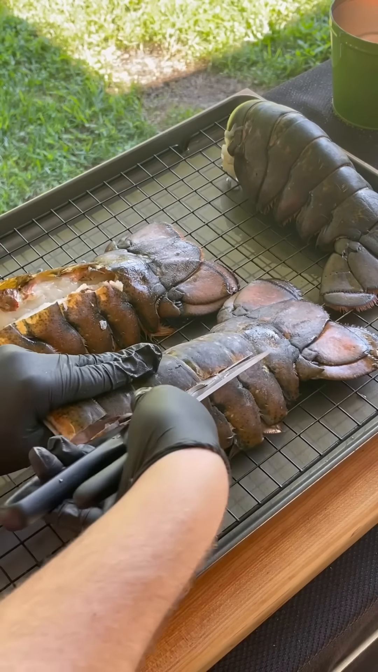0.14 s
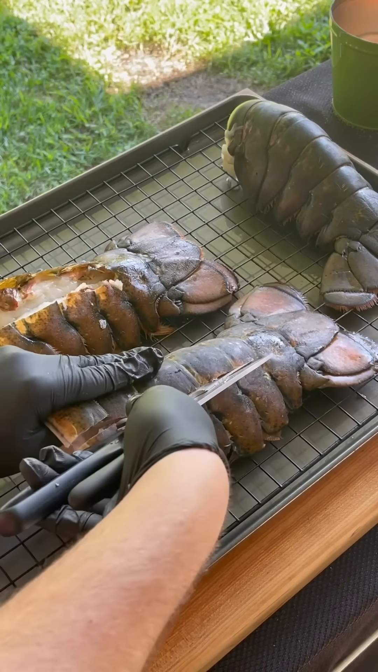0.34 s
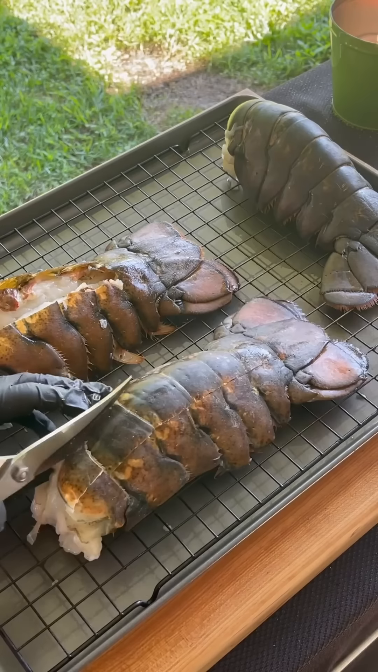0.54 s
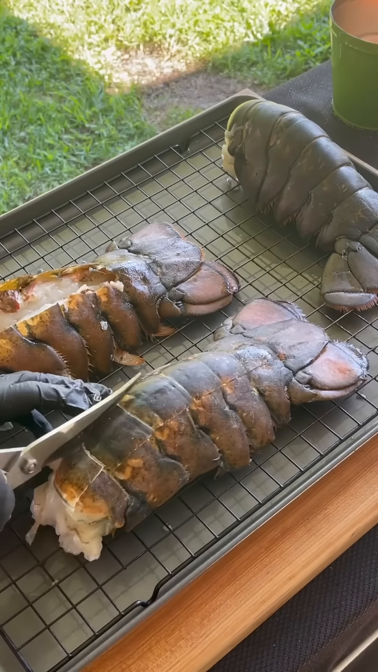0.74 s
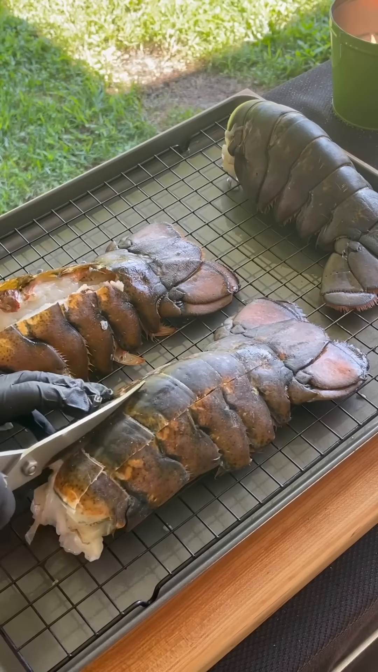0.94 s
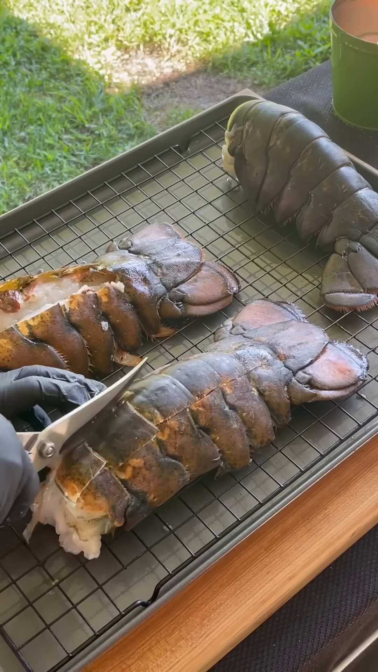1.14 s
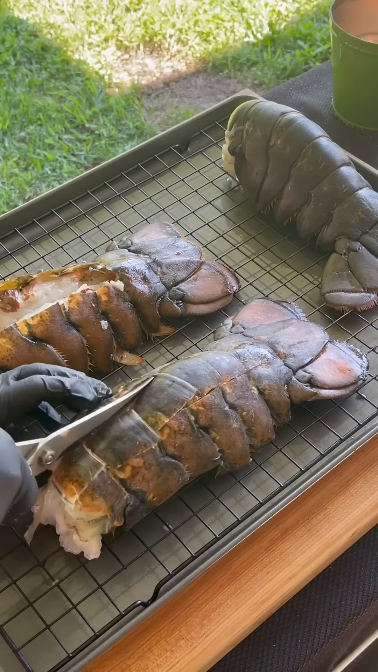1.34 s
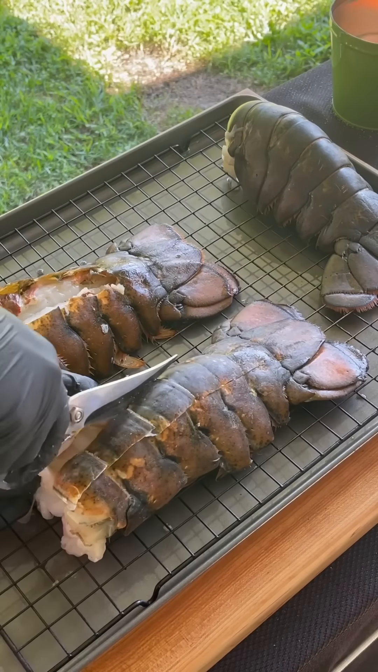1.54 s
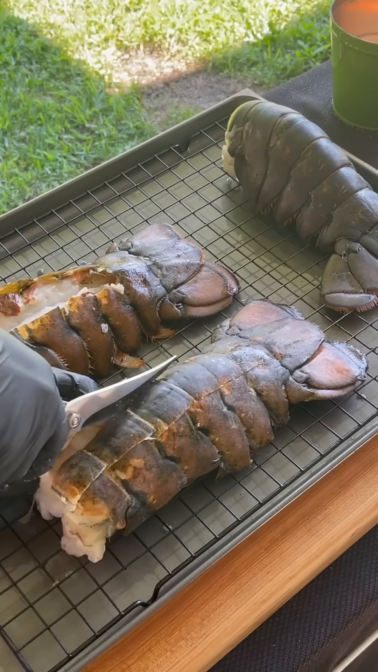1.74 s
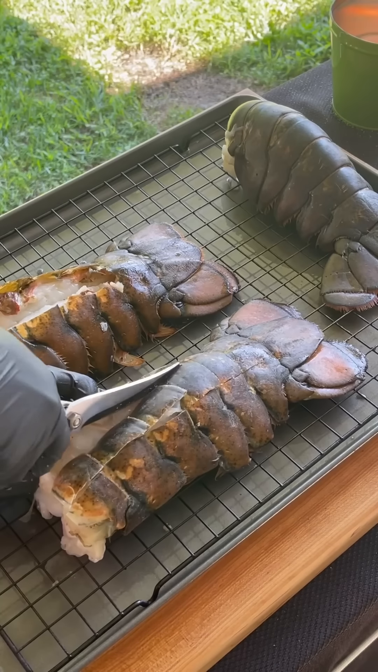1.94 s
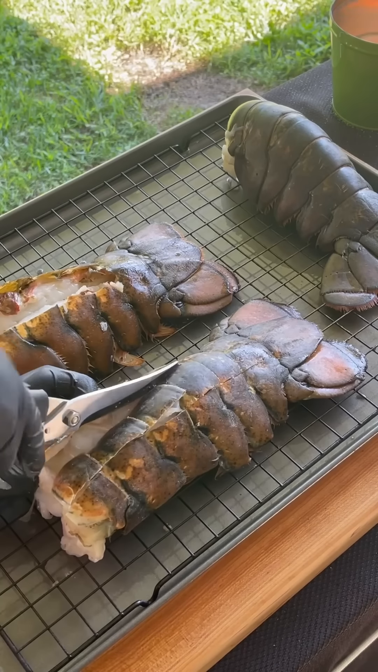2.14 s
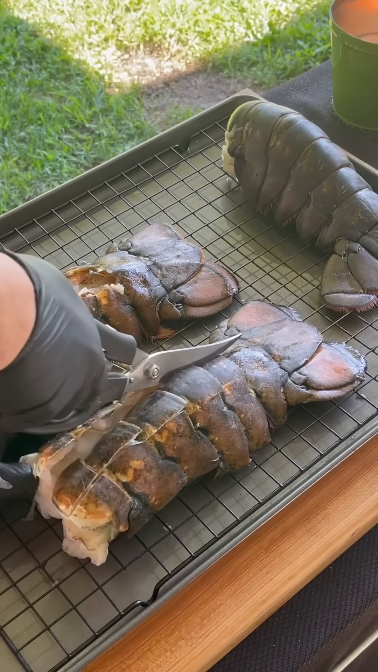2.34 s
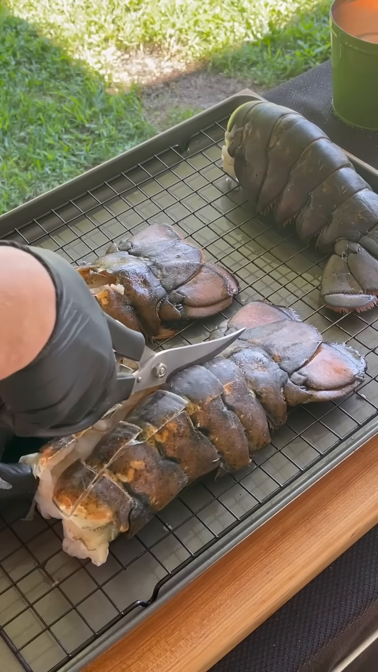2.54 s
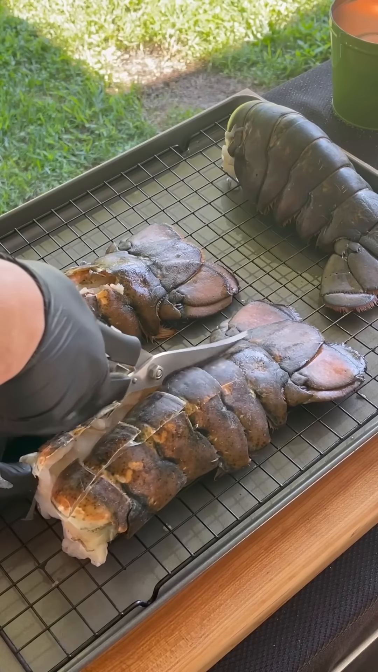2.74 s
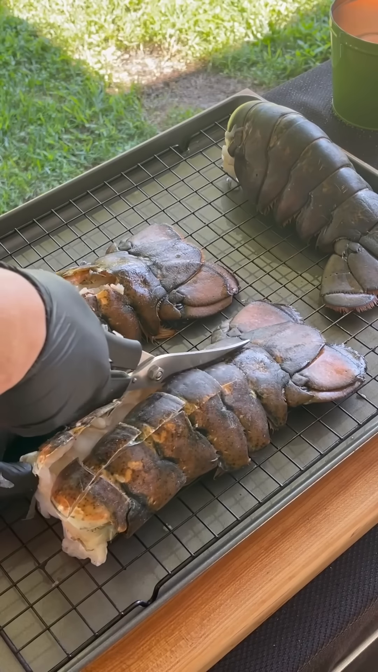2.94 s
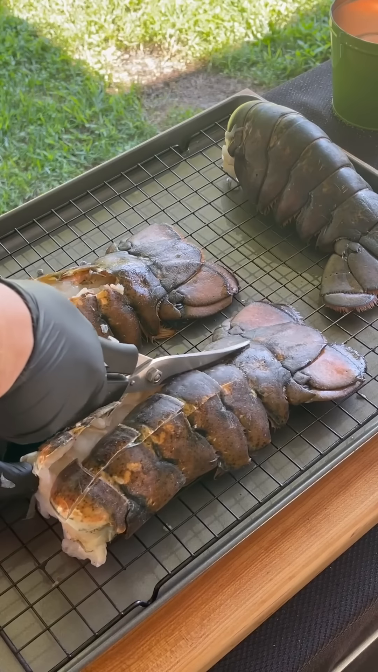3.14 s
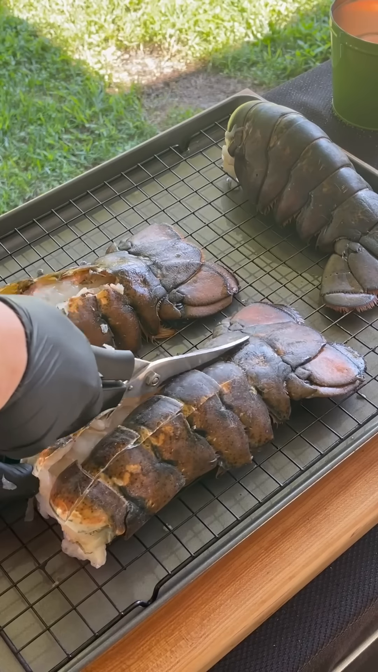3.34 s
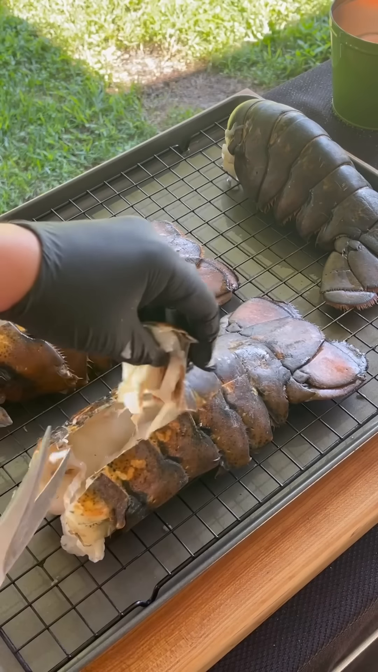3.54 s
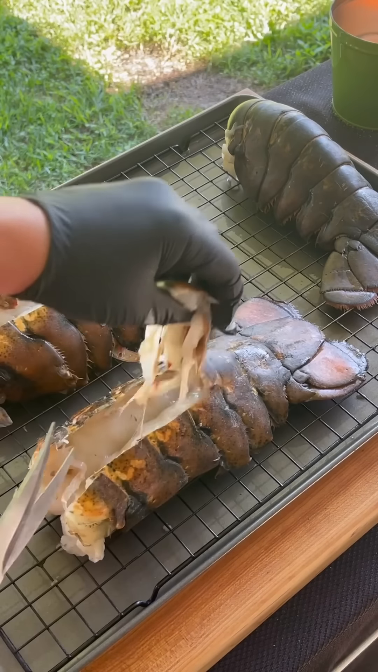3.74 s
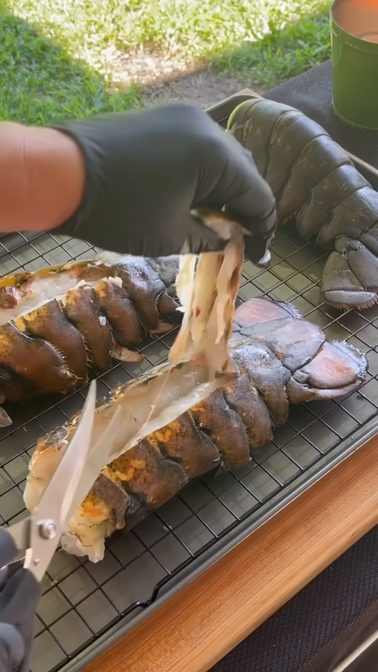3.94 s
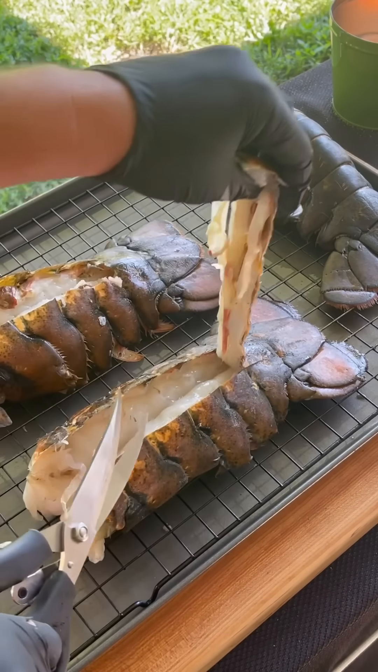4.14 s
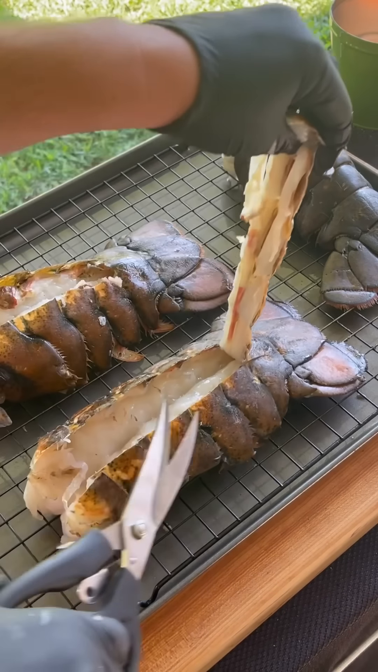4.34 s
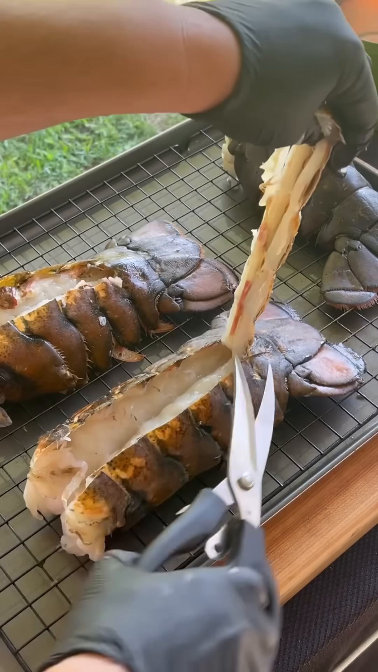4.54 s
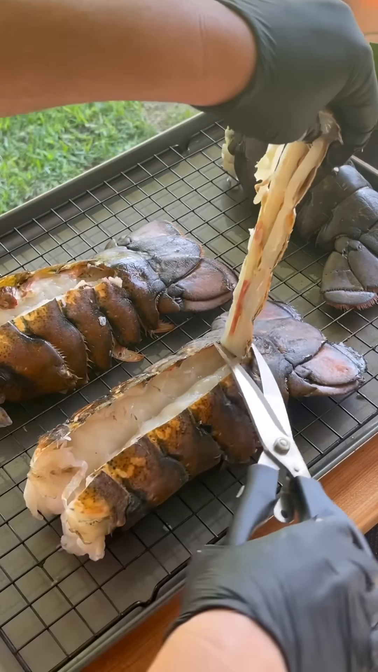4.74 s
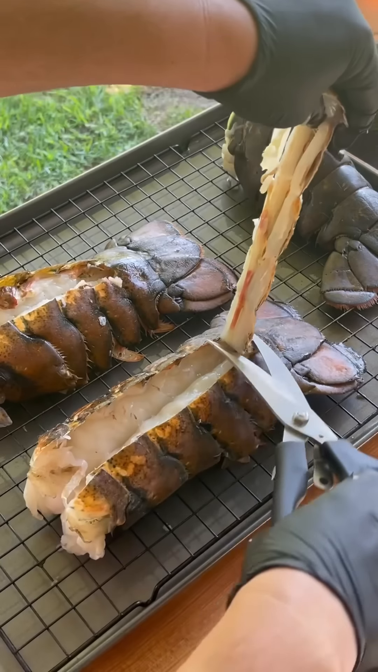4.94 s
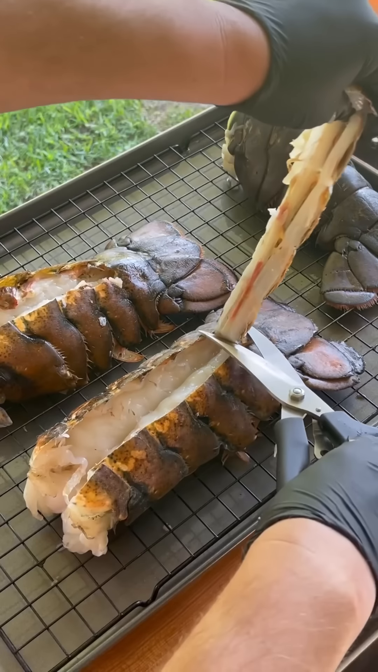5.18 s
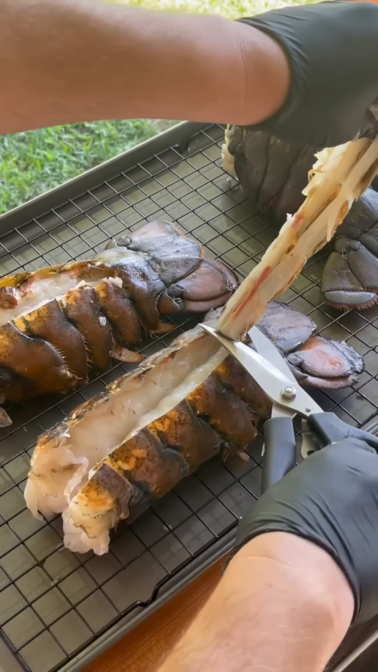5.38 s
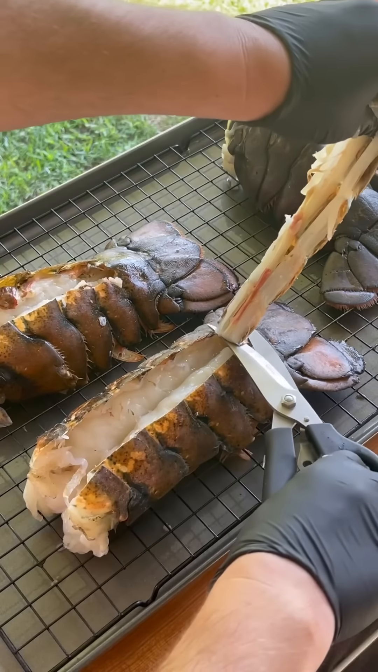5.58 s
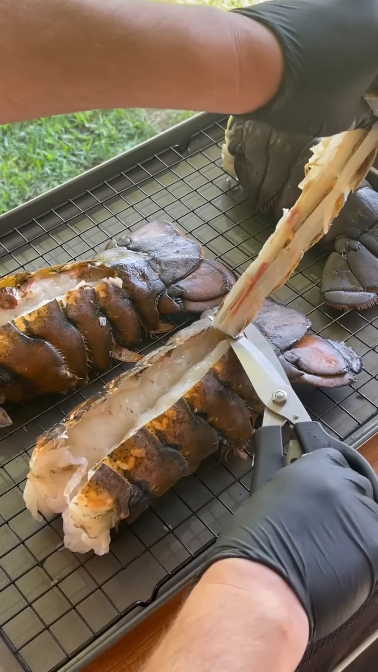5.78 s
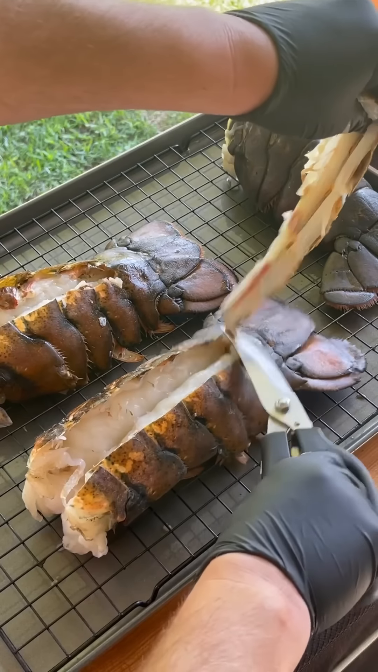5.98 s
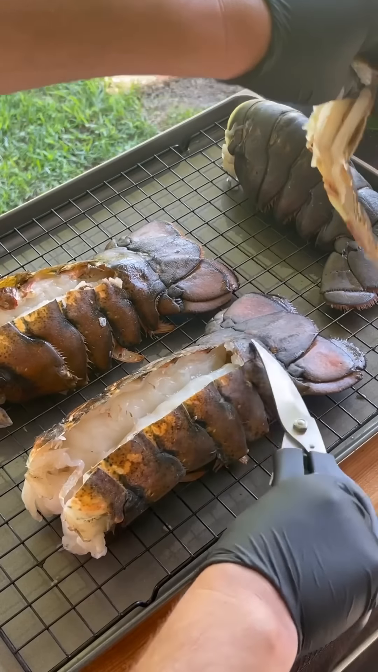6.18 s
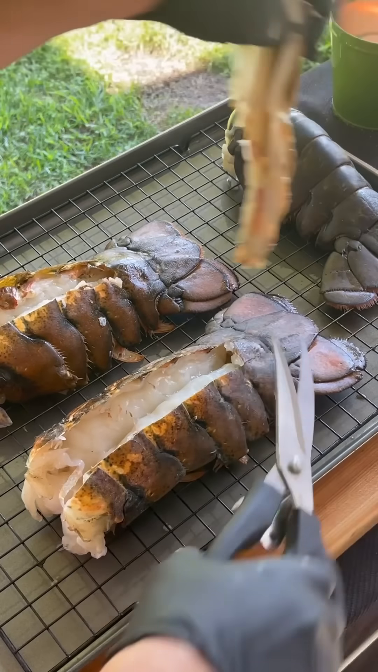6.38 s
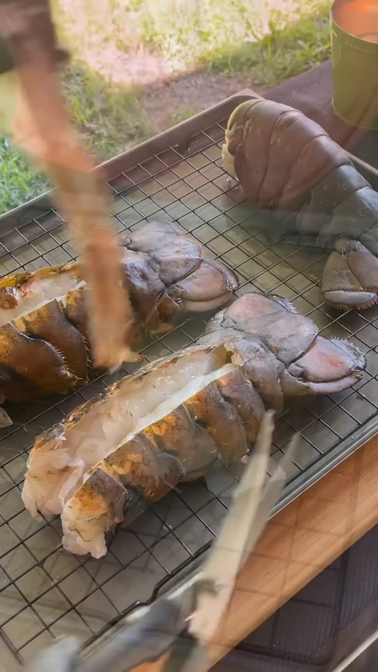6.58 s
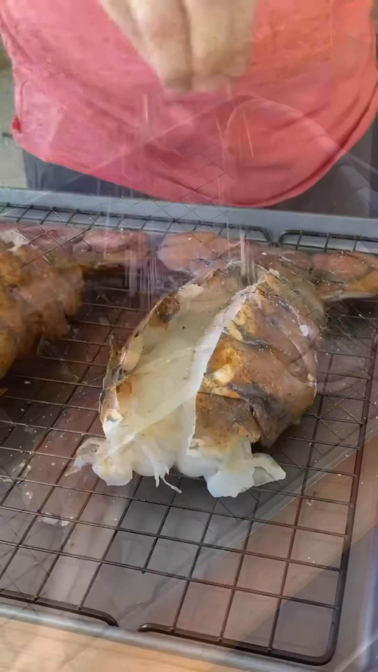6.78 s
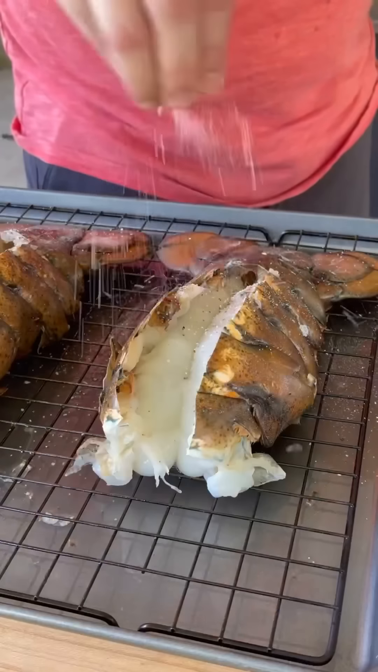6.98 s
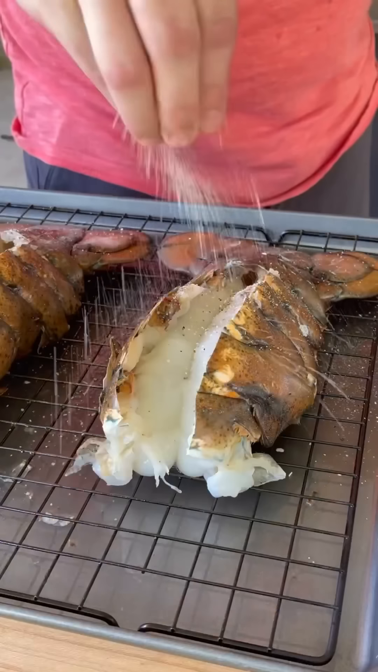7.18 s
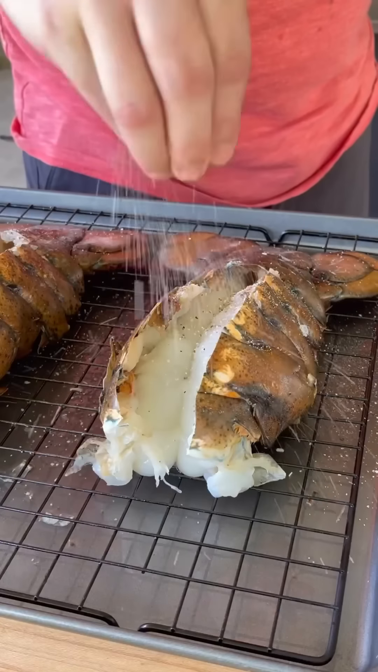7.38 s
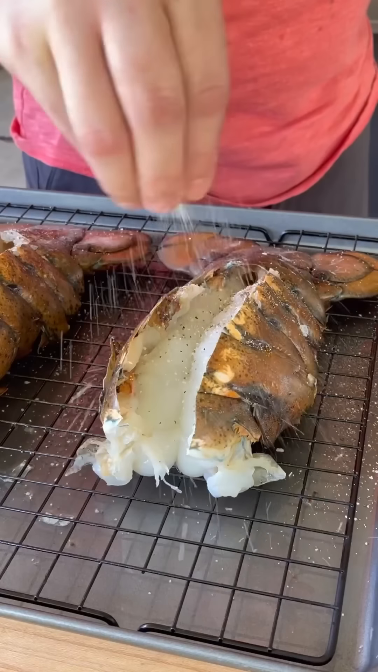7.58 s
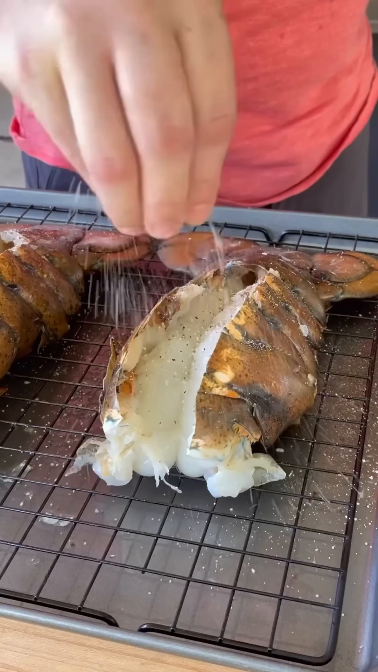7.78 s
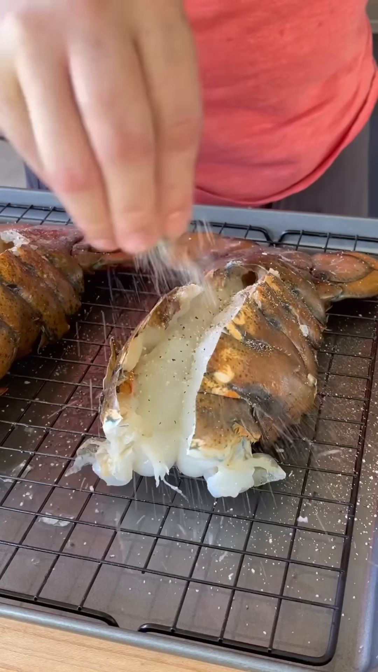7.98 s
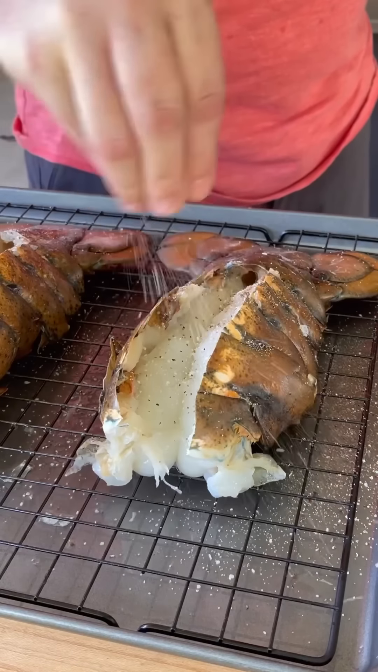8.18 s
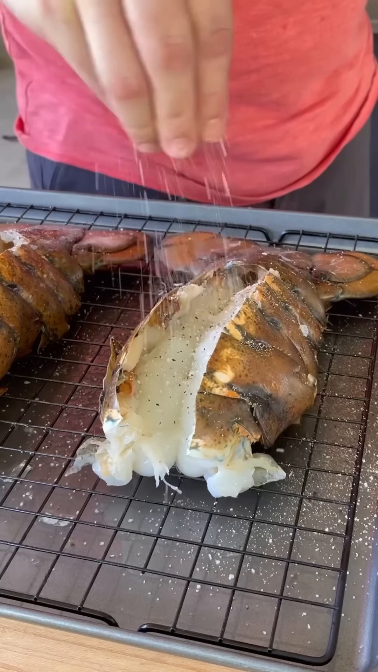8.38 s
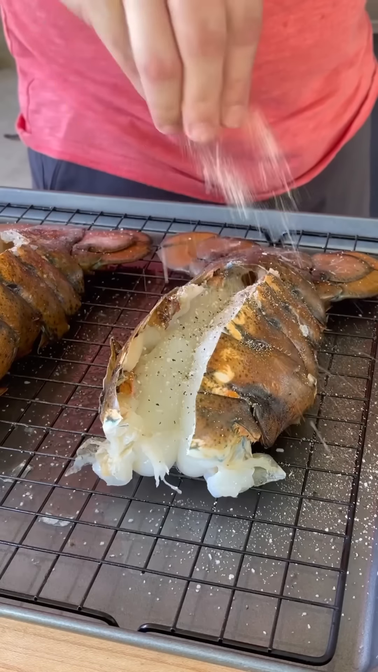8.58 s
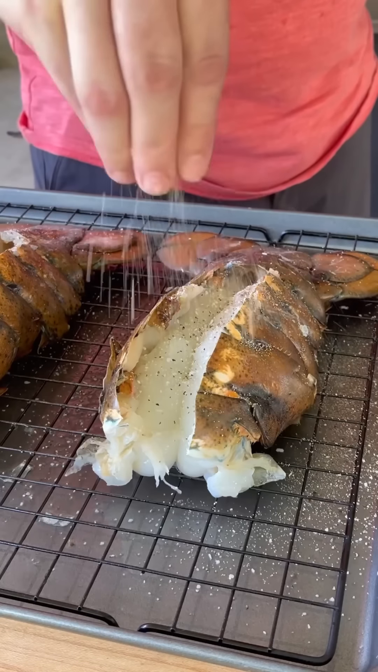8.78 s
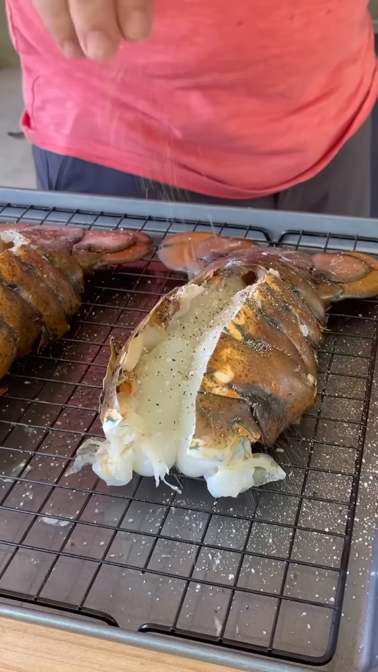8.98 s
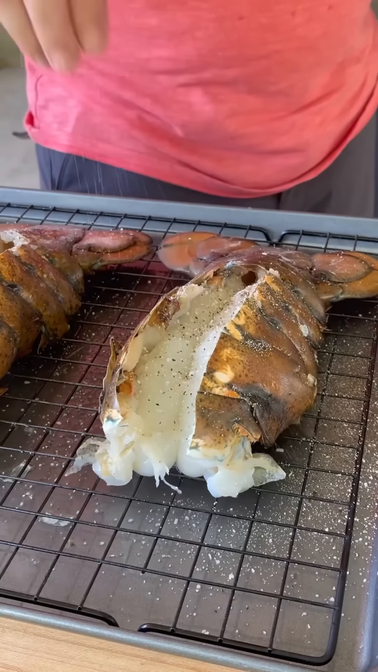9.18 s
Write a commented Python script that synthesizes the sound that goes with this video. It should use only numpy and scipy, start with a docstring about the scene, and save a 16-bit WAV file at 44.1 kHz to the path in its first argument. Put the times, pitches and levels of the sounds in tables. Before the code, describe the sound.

Hard shell snaps and crunches under scissor blades outdoors, a strip is peeled and clipped off, then grains of seasoning sprinkle down in a bright, ticking shower.

```python
"""Kitchen shears snip through lobster shells on a wire rack under a porch roof: noise bursts ring shell modes.
A drone fades at the start; a strip of shell is peeled and cut off over rubbing clicks and soft tray thuds.
From 6.5 s coarse seasoning rains on meat and tray as random grains, and a motor of sine orders and hiss joins.
Wavering hum lines, shaped-noise rumble, air and insects run throughout, with a short porch tail.
Two microphone ports hear the same sound with a phase turn that grows with pitch."""
import sys
import numpy as np
from scipy import signal
from scipy.fft import rfft, irfft, next_fast_len
from scipy.io import wavfile
from scipy.ndimage import uniform_filter1d

SR = 44100
rng = np.random.default_rng(int(sys.argv[2]) if len(sys.argv) > 2 else 0)


def digitize_waveform(pressure):
    """Quantize a signal to 16-bit integers and store it at the path in sys.argv[1].

    Rows of a 2-D input are taken as channels; values are limited to [-1, 1].
    """
    field = np.atleast_2d(pressure).T
    bounded = np.clip(field, -1, 1)
    quanta = np.round(bounded * 32767).astype(np.int16)
    wavfile.write(sys.argv[1], SR, quanta)


N = 406602
SIZE = next_fast_len(N + 4096)
HZ = np.maximum(np.fft.rfftfreq(SIZE, 1 / SR), 1)
TIME_S = np.arange(N) / SR
MODE_SPREAD_DB = 2.8   # chance strength of each mode in each blow

# diffuse left-right difference: pitch_hz, level_re_middle_db
SIDE_SPECTRUM = [(150, -30.5), (300, -7.5), (500, -1.5), (1100, -1.5), (1500, -5.5), (2000, -25),
                 (8000, -7.5), (14000, -27)]


def from_db(db):
    """Decibels to gain."""
    return 10 ** (np.asarray(db) / 20)


def rms_one(x):
    """Scale to unit rms."""
    return x / np.sqrt(np.mean(x ** 2) + 1e-20)


def in_time(rows):
    """Interpolate the columns of a time table at every sample."""
    s, *columns = np.transpose(rows)
    return [np.interp(TIME_S, s, column) for column in columns]


def at_hz(points):
    """Interpolate a spectrum table over log frequency at every FFT bin."""
    hz, value = np.transpose(points)
    return np.interp(np.log(HZ), np.log(hz), value)


def colour(x, points):
    """Filter by a spectrum table in dB, zero phase."""
    return irfft(rfft(x, SIZE) * from_db(at_hz(points)), SIZE)[..., :N]


def drift(rate_hz):
    """Slow random wander of unit rms: noise rolled off above rate_hz."""
    spectrum = rfft(rng.standard_normal(SIZE)) / (1 + (HZ / rate_hz) ** 2)
    return rms_one(irfft(spectrum, SIZE)[:N])


def resonate(x, hz, t60_s):
    """Two-pole decaying mode along the last axis."""
    r = from_db(-60 / (t60_s * SR))
    w = 2 * np.pi * hz / SR
    return signal.lfilter([0, np.sin(w)], [1, -2 * r * np.cos(w), r * r], x + 1e-18)


def band(x, low_hz, high_hz):
    """Second-order band-pass along the last axis."""
    return signal.sosfilt(signal.butter(2, [low_hz, high_hz], "band", fs=SR, output="sos"), x)


def random_clicks(per_s, spread_db):
    """Clicks of random sign, time and size (exponential in dB, capped)."""
    sizes = from_db(spread_db * np.minimum(rng.exponential(1, N), 5))
    signs = rng.choice([-1, 1], N)
    return sizes * signs * (rng.random(N) < per_s / SR)


def lay_out(times_s, rows):
    """Add each row at its time."""
    out = np.zeros(N + rows.shape[1])
    for s, row in zip(times_s, rows):
        at = round(s * SR)
        out[at:at + len(row)] += row
    return out[:N]


def three_voices(bursts, body_bursts, body_hz, upper_db):
    """Each burst rings the shell modes near its own pitch, a middle band and a bright band; levels set by caller."""
    # shell modes: pitch_hz, drive_db, t60_s
    shell_modes = [(510, -0.5, 0.009), (700, -1, 0.0061), (860, -0.5, 0.011), (1034, -4, 0.0035),
                   (1270, -2, 0.0099), (1526, 1.5, 0.0066), (1817, 5, 0.0074), (2110, 6, 0.01),
                   (2350, 9.5, 0.013)]
    body_cycles = 5.0   # 60 dB decay of the breaking piece, in cycles of its pitch
    chance = rng.standard_normal((len(bursts), len(shell_modes)))
    octaves = np.log2(np.array(shell_modes)[:, 0] / body_hz[:, None])
    strengths = from_db(MODE_SPREAD_DB * chance - 22.0 * octaves ** 2)
    modes = sum(strengths[:, [k]] * from_db(drive_db) * resonate(body_bursts, hz, t60_s)
                for k, (hz, drive_db, t60_s) in enumerate(shell_modes))
    # the piece that breaks rings most
    body = np.array([resonate(np.diff(row, prepend=0), hz, body_cycles / hz)
                     for row, hz in zip(modes, body_hz)])
    body = signal.sosfilt(signal.butter(2, 450, "high", fs=SR, output="sos"), body)
    middle = band(bursts, 1850, 2900) - from_db(upper_db[:, None]) * band(bursts, 3900, 8200)
    bright = band(bursts, 9000, 11700)
    bright = signal.sosfilt(signal.butter(5, 12300, fs=SR, output="sos"), bright)
    return body, middle, bright


def fractures(times_s, body_hz, levels_db, fall_12db_ms):
    """A fracture: a noise burst that rises fast and dies within milliseconds, in three voices."""
    rise_s, level_window_samples = 0.0004, 9
    t = np.arange(2048) / SR
    fall_s = np.maximum(fall_12db_ms[:, None], .05) / 1000
    bursts = rng.standard_normal((len(times_s), len(t))) * from_db(-12 * t / fall_s)
    bursts = bursts * np.clip(t / rise_s, 0, 1)
    _, middle_db, bright_db = levels_db
    # upper middle gain re lower middle: follows the brightness
    upper_db = -8 + 0.7 * (bright_db - middle_db) + 1.3 * rng.standard_normal(len(times_s))
    rows = 0
    for voice, db in zip(three_voices(bursts, bursts, body_hz, upper_db), levels_db):
        # level = loudest short-window rms
        power = uniform_filter1d(voice ** 2, level_window_samples)
        loudest = np.sqrt(power.max(axis=1, keepdims=True))
        rows = rows + voice / loudest * from_db(db[:, None])
    return lay_out(times_s, rows)


def shell_snaps():
    """Single snaps and ticks of the shell, each one fracture."""
    # snaps: start_s, body_hz, body_db, middle_db, bright_db, fall_12db_ms (floored at 0.05)
    snap_rows = [(0.047, 1150, -36.5, -43, -59, 5), (0.0613, 860, -48, -48, -45, 2),
                 (0.0735, 1240, -33, -48, -55, 4), (0.1218, 1400, -34.5, -47, -45, -0.5),
                 (0.135, 1400, -39, -50, -60, 4), (0.1456, 1400, -39, -65, -64, 2),
                 (0.1633, 1190, -39.5, -50, -62, 4), (0.1661, 660, -38, -42.5, -67, 5.5),
                 (0.181, 1310, -38, -45.5, -48, 1.5), (0.244, 940, -48, -48, -68, 20),
                 (0.306, 1350, -39.5, -66, -71, 2), (0.3363, 1300, -50, -80, -65.5, 0.5),
                 (0.4774, 920, -51, -58, -62, 10), (0.5076, 1040, -49, -56, -64, 21.5),
                 (0.63, 1670, -35.5, -31, -32.5, 3), (0.705, 1580, -42, -37.5, -36, 7),
                 (0.732, 1620, -12.5, -10.5, -6.5, 2.5), (0.7464, 1520, -33, -20, -6, -0.5),
                 (0.7472, 1500, -42, -19.5, -16, 2.5), (0.7497, 1510, -35, -18, -15, 5),
                 (0.97, 1080, -34, -40, -48, 2.5), (0.977, 900, -46, -47, -40, 6),
                 (1.0014, 1390, -29.5, -24, -20.5, 4), (1.0094, 1210, -41, -45, -34, 1),
                 (1.1456, 1060, -50, -40, -32, 1.5), (1.16, 1050, -50, -50, -40, 19),
                 (1.19, 1350, -37, -33, -23, 2.5), (1.201, 1490, -23.5, -19, -13, 3),
                 (1.2808, 1210, -16.5, -41, -7, 3.5), (1.534, 1795, -36, -22, -14.5, 3),
                 (1.54, 1850, -31.5, -22, -16.5, 2.5), (1.579, 1870, -48, -36, -28, 0.5),
                 (1.5829, 1300, -35, -20, -14, 2), (1.5854, 1190, -27, -22, -16, 0.5),
                 (1.594, 1370, -38, -37, -27, 1.5), (1.631, 1780, -24.5, -20, -15.5, 2.5),
                 (1.8897, 1120, -45, -46, -45.5, 7.5), (1.9, 1340, -58, -56, -51, 14),
                 (1.9038, 1130, -59, -45, -42.5, 2.5), (1.911, 830, -49, -50, -45.5, 5),
                 (1.9177, 1021, -46, -42, -30, 1), (2.0495, 1590, -38.5, -30.5, -24.5, 1.5),
                 (2.226, 1900, -60, -51, -70, -0.5), (2.271, 1590, -33, -35, -29.5, 14),
                 (2.5127, 1330, -41, -62, -63, 11), (2.6977, 1000, -65, -59.5, -45, 9),
                 (2.7213, 925, -32, -22, -18, 1.5), (2.747, 2000, -31, -26, -19, 1),
                 (2.7495, 1920, -19, -14.5, -10.5, 0), (2.7535, 1780, -22.5, -42, -32, 1.5),
                 (2.7825, 1590, -33, -44, -34.5, 2), (2.7959, 1850, -32, -35, -38, 1),
                 (2.871, 1990, -39, -46, -35, 0), (2.875, 1470, -30, -35, -30, 1.5),
                 (3.0313, 1440, -33.5, -38, -34.5, 3.5), (3.0523, 1710, -36, -40, -39, 0),
                 (3.0553, 1160, -38.5, -38, -28.5, 5.5), (3.102, 1800, -43, -40, -41, 10),
                 (3.114, 1780, -29.5, -41, -26.5, 4.5), (3.1203, 900, -27.5, -29, -17, 2),
                 (3.33, 1500, -49.5, -51, -61, 3.5), (3.381, 1280, -50, -49, -58, 8.5),
                 (3.395, 1100, -48, -47.5, -54, 7), (3.508, 1900, -49.5, -61, -62, 6),
                 (3.6627, 2000, -51, -59, -58, 0), (3.6785, 1800, -51, -55, -62, 4),
                 (3.7168, 1800, -46.5, -56, -48.5, 2.5), (3.7248, 1600, -48, -44.5, -52, 2),
                 (3.785, 1190, -56, -42.5, -37, 2), (3.9313, 1500, -53, -50.5, -52, 7),
                 (4.003, 1720, -46.5, -53.5, -59, 7), (4.1271, 1455, -38.5, -39.5, -38, 1.5),
                 (4.719, 1010, -55, -56, -59, 1), (4.7314, 1210, -44.5, -42.5, -50, 2.5),
                 (4.92, 960, -56, -57, -49, 4), (5.108, 1200, -56, -58.5, -48, 6),
                 (5.3778, 1400, -52, -68.5, -63.5, 0), (5.388, 1450, -50, -72, -65, 0),
                 (5.4004, 1510, -48, -70, -66, 7.5), (5.4118, 1700, -52, -67, -55, 6),
                 (5.4244, 1360, -46, -66, -47, 8), (5.4355, 1650, -45, -57, -55.5, -2.5),
                 (5.4384, 1680, -39, -48, -44.5, 2.5), (5.4433, 1600, -41, -59, -49, 7),
                 (5.4508, 1690, -48, -60, -50, 0), (5.4598, 1640, -35.5, -41, -46, 2.5),
                 (5.4645, 1650, -46, -50, -46, 4), (5.513, 1120, -51, -50.5, -68, 1),
                 (5.7159, 1330, -38, -54, -45, 1), (5.766, 990, -54.5, -59, -46, 4.5),
                 (5.815, 1760, -39.5, -45, -36.5, 4.5), (5.8265, 1190, -59, -38, -38, 0.5),
                 (5.8364, 1090, -48, -50.5, -40, 1), (5.8991, 1590, -35.5, -41, -27.5, 1.5),
                 (5.909, 1780, -36, -44, -20, -0.5), (5.9181, 1780, -35.5, -37, -33, 2),
                 (5.9237, 1620, -33.5, -26, -24, -1.5), (5.9301, 1820, -22, -27, -9.5, 2.1),
                 (5.9449, 1774, -30, -34, -20.5, 1.5), (5.9492, 1700, -24, -38, -32, 0),
                 (5.9517, 1880, -24, -18.5, -35, 2), (5.957, 1600, -30, -32, -21, 0.5),
                 (5.9637, 1800, -16.5, -16, -8.5, 2), (5.9707, 1430, -26, -40, -38, 5),
                 (5.9768, 1600, -24, -32, -27, 0.5), (5.9796, 1590, -20.5, -20.5, -25, 7),
                 (6.1379, 960, -55, -46.5, -37, 3), (6.2166, 1140, -54, -63, -47.5, 14), ]
    start_s, body_hz, *levels_db, fall_12db_ms = np.transpose(snap_rows)
    return fractures(start_s, body_hz, levels_db, fall_12db_ms)


def crunches():
    """Closing blades make many small fractures in a row; the treble leads and the body swells after it."""
    # crushing cuts: start_s, end_s, body_hz, body_db, middle_db, bright_db, upper_re_lower_middle_gain_db
    crunch_rows = [(0.746, 0.757, 1210, -22.5, -23.5, -22.5, -5), (1.171, 1.21, 1390, -52, -47.5, -48, 4),
                   (1.281, 1.292, 1110, -26.5, -20.5, -28, 0.5), (1.7359, 1.745, 1135, -19, -17.5, -16, -6),
                   (1.747, 1.75, 1180, -23.5, -24, -24, -11),
                   (2.256, 2.277, 1400, -44.5, -44.5, -44.5, -12),
                   (2.42, 2.468, 1490, -64.5, -60.5, -67, -12), (2.713, 2.724, 840, -32.5, -33, -30.5, -2),
                   (2.742, 2.744, 1510, -52, -37, -36, 14), (2.748, 2.754, 890, -33.5, -32.5, -40, 9),
                   (2.777, 2.801, 1500, -52, -49, -46, -2), (2.87, 2.876, 1490, -39, -42.5, -40, 5),
                   (3.049, 3.055, 1220, -46, -43, -39, 8), (3.118, 3.127, 920, -38, -35.5, -39, 0),
                   (4.851, 4.938, 1200, -70, -68.5, -76, 11), (4.946, 4.98, 1580, -60, -63.5, -73, -10),
                   (5.102, 5.117, 1200, -73, -66, -63, 12), (5.419, 5.474, 1620, -63, -80, -62.5, -2.5),
                   (5.907, 5.94, 1770, -50, -54, -48, -7), (5.943, 5.961, 1810, -44, -43, -31, 6),
                   (5.968, 5.998, 1690, -41, -39, -41, -18), (6.135, 6.137, 1130, -48, -56, -60, 1),
                   (9.173, 9.213, 990, -60.5, -61.5, -71, -7)]
    start_s, end_s, body_hz, *levels_db, upper_db = np.transpose(crunch_rows)
    t = np.arange(4096) / SR
    span_s = (end_s - start_s)[:, None]
    # weakens through the cut, then falls steeply
    fall_db = -5.0 * t / span_s - 5300 * np.maximum(t - span_s, 0)
    shape = np.clip(t / 0.0035, 0, 1) * from_db(fall_db)
    lumps = rng.standard_normal((len(start_s), 128)).repeat(32, axis=1)   # held 32 samples each
    bursts = rng.standard_normal(shape.shape) * from_db(4.1 * lumps) * shape
    body_bursts = bursts * (t / span_s) ** 0.94
    rows = 0
    for voice, db in zip(three_voices(bursts, body_bursts, body_hz, upper_db), levels_db):
        # level = energy spread over the span
        rms = np.sqrt(np.sum(voice ** 2, axis=1, keepdims=True) / (span_s * SR))
        rows = rows + voice / rms * from_db(db[:, None])
    return lay_out(start_s, rows)


def thuds():
    """Cuts knock the tail against the tray: a short soft push rings low modes of random strength."""
    # knocks: start_s, peak_db
    thud_rows = [(0.073, -37), (0.121, -43), (0.165, -34), (0.305, -42), (0.63, -51.5), (0.733, -36.5),
                 (0.749, -33.5), (0.969, -45.5), (1.001, -46), (1.202, -42), (1.279, -30), (1.29, -31.5),
                 (1.533, -46.5), (1.582, -38.5), (1.631, -47.5), (1.741, -30.5), (1.748, -34), (2.049, -49),
                 (2.27, -49), (2.716, -34.5), (2.75, -39), (2.783, -43.5), (2.873, -42), (3.031, -44),
                 (3.054, -40.5), (3.114, -52), (3.119, -39), (5.93, -43.5), (5.953, -42), (5.964, -41),
                 (5.979, -33)]
    # tray modes: pitch_hz, drive_db, t60_s
    tray_modes = [(228, -7.5, 0.023), (330, -6.5, 0.026), (460, -3.5, 0.025), (600, -5.5, 0.04)]
    contact_s = 0.0018
    start_s, peak_db = np.transpose(thud_rows)
    t = np.arange(4096) / SR
    push = np.sin(np.pi * np.clip(t / contact_s, 0, 1))
    blow = np.diff(push, prepend=0)
    rings = np.array([(-1) ** k * from_db(drive_db) * resonate(blow, hz, t60_s)
                      for k, (hz, drive_db, t60_s) in enumerate(tray_modes)])
    chance = rng.standard_normal((len(start_s), len(tray_modes)))
    rows = from_db(MODE_SPREAD_DB * chance) @ rings
    peaks = np.abs(rows).max(axis=1, keepdims=True)
    return lay_out(start_s, rows / peaks * from_db(peak_db[:, None]))


def rustle():
    """Gloves and shell rub: dense weak clicks in clumps, dull and bright, until the hands leave."""
    # rubbing level before wander: time_s, dull_db, bright_db
    rub_levels = [(0.0, -74, -78), (0.14, -60.5, -71), (0.36, -71.5, -75), (0.52, -58, -53),
                  (0.6, -74, -67), (0.9, -63, -60.5), (1.17, -69, -61), (1.89, -65.5, -60.5),
                  (2.25, -71.5, -64.5), (2.5, -63.5, -70.5), (2.62, -72, -74), (2.88, -77, -68),
                  (3.3, -70.5, -74), (3.45, -67.5, -64), (3.96, -71, -68), (4.4, -80.5, -71.5),
                  (4.8, -72, -69.5), (4.901, -82, -59.5), (5.03, -72.5, -66.5), (5.12, -73, -59.5),
                  (5.25, -82, -81.5), (5.46, -63, -77), (5.6, -68.5, -72), (5.85, -62.5, -56),
                  (6.12, -65.5, -62), (6.35, -78, -80.5), (6.481, -73, -77)]
    # dull part: pitch_hz, density_db_per_hz
    dull_spectrum = [(300, -39.5), (900, -4.5), (1500, -0.5), (2200, -4.5), (3500, -5), (5000, -12),
                     (8000, -64)]
    # bright part: pitch_hz, density_db_per_hz
    bright_spectrum = [(2500, -47.5), (4300, -6.5), (5500, 0), (7500, 3), (9500, 11), (11300, 7),
                       (12300, -27.5), (13500, -59.5)]
    wander_db, wander_hz = 0.2, 7.2
    present = np.clip((rub_levels[-1][0] - TIME_S) / 0.092, 0, 1)
    clicks = random_clicks(3600, spread_db=2.0) * from_db(3.9 * drift(23))
    dull_db, bright_db = [db + wander_db * drift(wander_hz) for db in in_time(rub_levels)]
    dull = from_db(dull_db) * rms_one(colour(clicks, dull_spectrum))
    bright = from_db(bright_db) * rms_one(colour(clicks, bright_spectrum))
    return present * (dull + bright)


def grain_hits(times_s, middle_db, bright_db):
    """Single grains land as short fractures of one pitch."""
    body_hz, body_re_middle_db, fall_12db_ms = 1860, -15, 2.73
    count = len(times_s)
    levels_db = [middle_db + body_re_middle_db, middle_db, bright_db]
    return fractures(times_s, np.full(count, body_hz), levels_db, np.full(count, fall_12db_ms))


def shower():
    """Seasoning lands on meat and tray: dense fine clicks in clumps, with larger grains apart."""
    # fine shower level before wander: time_s, level_db
    shower_levels = [(6.5, -68), (6.58, -58.5), (6.71, -52.5), (6.76, -51), (7.39, -56), (7.61, -58),
                     (7.76, -59), (8.01, -55), (8.17, -60), (8.4, -58.5), (8.57, -57), (8.84, -56),
                     (8.99, -62), (9.22, -75)]
    # fine shower: pitch_hz, density_db_per_hz
    shower_spectrum = [(500, -46.5), (1500, -20), (2500, -7), (4000, -7), (7000, -6.5), (9000, -11),
                       (10800, 7), (12300, -9), (13500, -20), (16000, -28)]
    # loudest coarse grains: start_s, middle_db, bright_db
    coarse_grains = [(6.5364, -46.5, -44), (6.564, -49, -42), (6.602, -39.5, -34.5), (6.622, -38.5, -31),
                     (6.6418, -43, -35), (6.6611, -37, -26.5), (6.6848, -46, -35), (6.722, -46, -39),
                     (6.759, -43, -46), (6.784, -36, -24.5), (6.79, -33, -25), (6.8291, -46, -35),
                     (6.846, -44, -35), (6.8889, -36.5, -32.5), (7.039, -41.5, -33), (7.0513, -55, -45),
                     (7.107, -39.5, -35), (7.1163, -45, -32), (7.1528, -55, -43), (7.1678, -52, -36),
                     (7.2162, -36, -30), (7.24, -52, -32), (7.291, -49, -35), (7.3165, -49, -38),
                     (7.3207, -45, -36), (7.334, -49, -40), (7.3385, -45, -37), (7.3639, -47, -34),
                     (7.3775, -46, -30), (7.3792, -41.5, -24.5), (7.4557, -48, -42), (7.46, -40, -34),
                     (7.4623, -46, -35), (7.466, -47, -42), (7.5407, -46, -32.5), (7.6956, -55, -44),
                     (7.726, -50, -38), (7.8123, -63, -39), (7.8572, -53, -34), (7.956, -62, -43),
                     (7.9818, -54, -38), (8.0134, -58, -43), (8.035, -58, -39), (8.102, -49, -33.5),
                     (8.1434, -47, -36), (8.4468, -50, -43), (8.468, -44, -38), (8.508, -46, -34),
                     (8.5864, -43, -33.5), (8.633, -54, -36), (8.6445, -50, -37), (8.6682, -42.5, -33),
                     (8.74, -46, -36), (8.7705, -57, -38), (8.7782, -52, -37), (8.781, -48, -35),
                     (8.784, -50, -43), (8.8435, -52, -43), (8.893, -57, -43), (8.929, -42.5, -30),
                     (8.96, -43, -39), (9.013, -53, -37)]
    wander_db, wander_hz = 4, 19
    small_per_s, small_re_shower_db = 22, (0.5, 13)   # middle, bright

    clicks = random_clicks(2000, spread_db=2.0) * from_db(0.86 * drift(32.0))
    fine = rms_one(colour(clicks, shower_spectrum))
    pouring = np.clip((TIME_S - shower_levels[0][0]) / 0.024, 0, 1)
    level_db = in_time(shower_levels)[0] + wander_db * drift(wander_hz)

    first_s, last_s = coarse_grains[0][0], coarse_grains[-1][0]
    small_s = rng.uniform(first_s, last_s, round(small_per_s * (last_s - first_s)))
    chance_db = 2.9 * rng.standard_normal((len(small_s), 2))
    around_db = np.interp(small_s, *np.transpose(shower_levels))
    middle_db, bright_db = around_db + (small_re_shower_db + chance_db).T
    small = grain_hits(small_s, middle_db, bright_db)
    return from_db(level_db) * pouring * fine + small + grain_hits(*np.transpose(coarse_grains))


def porch(near):
    """Roof and wall return a short dense noise tail, as (middle, left-right difference)."""
    # tail colour: pitch_hz, gain_db
    tail_spectrum = [(300, 10), (1000, -2.5), (2500, -1), (4000, -1), (6500, -3), (11000, -3.5),
                     (12300, -11.5), (13500, -26.5)]
    t60_s, tail_db, rise_s, shift_hz = 0.25, -10.5, 0.0023, 1.5
    t = np.arange(SR // 2) / SR
    tail = rng.standard_normal((3, len(t))) * from_db(-60 * t / t60_s)
    tail = tail * np.clip(t / rise_s, 0, 1)
    tail = from_db(tail_db) * tail / np.sqrt(np.sum(tail[0] ** 2))
    # hands and arms move, so the fine pattern turns between two tails
    turn_rad = 2 * drift(shift_hz)
    shares = np.array([np.cos(turn_rad), np.sin(turn_rad), np.ones(N)])
    sent = colour(near, tail_spectrum) * shares
    one, other, difference = signal.fftconvolve(sent, tail, axes=1)[:, :N]
    return one + other, from_db(-3.0) * colour(difference, SIDE_SPECTRUM)


def motor():
    """Motor orders as sines, each swelling on its own, over shaped-noise fan hiss."""
    # orders before swell: multiple of the base pitch -> peak_db
    order_levels = {4.08: -61, 5: -65, 13: -78, 20: -78, 22: -78, 24: -80, 32: -80, 34: -72, 48: -79, 49:
                    -72, 50: -79, 85: -73}
    # fan hiss: pitch_hz, density_db_per_hz
    hiss_spectrum = [(400, -42), (1000, -2), (1800, 2.5), (3000, 1), (5000, 0.5), (8000, 8), (11000, -13),
                     (12500, -28), (14000, -59.5)]
    base_hz, start_s, hiss_db = 58.82, 6.52, -63
    orders = 0
    for multiple, db in order_levels.items():
        turns = multiple * base_hz * TIME_S + rng.random()
        orders = orders + from_db(db + 1.46 * drift(3.6)) * np.sin(2 * np.pi * turns)
    hiss = from_db(hiss_db) * rms_one(colour(rng.standard_normal(N), hiss_spectrum))
    since_s = TIME_S - start_s
    return orders * np.clip(since_s / 0.14, 0, 1) + hiss * np.clip(since_s / 0.012, 0, 1)


def hum():
    """Bass sines wavering in pitch and level, and a short drone at the start."""
    # hum rms before wander: time_s, low_line_db, upper_line_db
    hum_levels = [(0.0, -68, -54), (0.23, -64, -68), (1.34, -53, -56), (2.39, -61.5, -65),
                  (2.44, -58.5, -70.5), (2.539, -54, -50), (3.13, -54.5, -63.5), (3.67, -47, -49.5),
                  (3.82, -47, -57.5), (4.57, -55.5, -51), (4.78, -46.5, -58.5), (4.93, -64, -59),
                  (5.03, -51, -50.5), (5.83, -53, -61), (6.57, -45.5, -48.5), (6.681, -47.5, -75),
                  (7.19, -56.5, -50.5), (8.45, -47.5, -62), (8.86, -61, -50), (8.94, -57, -68),
                  (9.04, -43, -51.5), (9.22, -56, -49)]
    # mean pitch of the lines: low_hz, upper_hz
    line_pitches = (56.4, 123.3)
    # drone, peak before wander: end_s, pitch_hz, level_db
    drone_row = (0.437, 96.706, -45.5)
    width_hz, wander_db, wander_hz = 1.494, 2.4, 4.4
    lines = 0
    for db, hz in zip(in_time(hum_levels), line_pitches):
        turns = np.cumsum(hz + width_hz * drift(4.03)) / SR
        gain = np.sqrt(2) * from_db(db + wander_db * drift(wander_hz))
        lines = lines + gain * np.sin(2 * np.pi * turns)
    end_s, drone_hz, drone_db = drone_row
    turns = np.cumsum(drone_hz + 1.4 * drift(4.8)) / SR
    drone = from_db(drone_db + 2.0 * drift(4.1)) * np.sin(2 * np.pi * turns)
    return lines + drone * np.clip((end_s - TIME_S) / 0.033, 0, 1)


def insects():
    """A thin high garden chorus: band-shaped noise with a wandering level."""
    # chorus: pitch_hz, density_db_per_hz
    chorus_spectrum = [(5500, -53), (7500, -23), (8500, -2), (9200, 2), (10200, -7.5), (11300, -26),
                       (12200, -47.5), (13500, -82)]
    chorus = rms_one(colour(rng.standard_normal(N), chorus_spectrum))
    return from_db(-61 + 2.6 * drift(3.6)) * chorus


def outdoors():
    """Distant rumble and air as shaped noise, as (middle, left-right difference)."""
    # background: time_s, air_db, rumble_db
    outdoor_levels = [(0.0, -59.5, -49.5), (0.44, -62, -51.5), (1.1, -62.5, -52.5), (1.56, -62, -52.5),
                      (1.74, -61, -54.5), (2.08, -62, -53), (6.39, -58, -52), (6.68, -55, -45.5),
                      (6.88, -60.5, -52.5), (7.32, -63, -53.5), (9.22, -63, -51.5)]
    # rumble: pitch_hz, density_db_per_hz
    rumble_spectrum = [(20, -42.5), (32, -15.5), (45, -5), (60, -1.5), (90, -1), (128, -5.5), (170, -7),
                       (250, -12.5), (400, -26.5), (900, -80.5)]
    # air: pitch_hz, density_db_per_hz
    air_spectrum = [(100, -30), (300, 1), (600, -5.5), (1000, -4.5), (2000, -13), (3500, -27),
                    (6000, -32.5), (9000, -15), (11300, -31), (12500, -66), (14000, -91.5)]
    air_db, rumble_db = in_time(outdoor_levels)
    low, middle, difference = rng.standard_normal((3, N))
    rumble = from_db(rumble_db) * rms_one(colour(low, rumble_spectrum))
    air = colour(middle, air_spectrum)
    scale = from_db(air_db) / np.std(air)
    side = colour(colour(difference, air_spectrum), SIDE_SPECTRUM)
    return rumble + scale * air, scale * side


def scene():
    """Sum the sources at one point; only air and tail also differ between the sides."""
    near = shell_snaps() + crunches() + thuds() + shower() + rustle()
    tail, tail_side = porch(near)
    air, air_side = outdoors()
    middle = near + tail + air + hum() + motor() + insects()
    return middle + (tail_side + air_side) * np.array([[1], [-1]])


def record(dry):
    """Ports turn phase and level against each other; peaks are softly rounded and the top is cut."""
    # phase between ports: pitch_hz, left_lead_rad
    port_turn = [(0, 0), (430, 0.3), (690, -0.4), (2580, 0.5), (4130, 0.7), (4570, 1.6), (5250, 5.3),
                 (5510, 5.9), (8440, 9.1), (9470, 9.6), (11500, 11.7), (12500, 13.0), (13800, 13.6),
                 (14900, 15.7), (16100, 15.7)]
    # level between ports: pitch_hz, left_minus_right_db
    port_balance = [(150, 0), (330, 1.5), (520, 3.5), (800, .5), (2000, 0)]
    cutoff_hz = 16400
    turn_rad = np.interp(HZ, *np.transpose(port_turn))
    half = from_db(at_hz(port_balance) / 2) * np.exp(.5j * turn_rad)   # half to each port
    ports = irfft(rfft(dry, SIZE) * np.array([half, 1 / half]), SIZE)[:, :N]
    rounded = np.tanh(ports / 1.2) * 1.2
    return signal.sosfilt(signal.cheby2(12, 70, cutoff_hz, fs=SR, output="sos"), rounded)


dry = scene()
out = record(dry)
digitize_waveform(out)
```